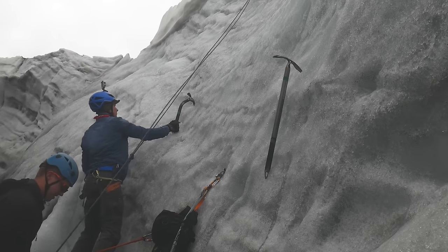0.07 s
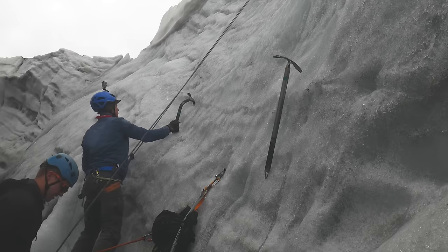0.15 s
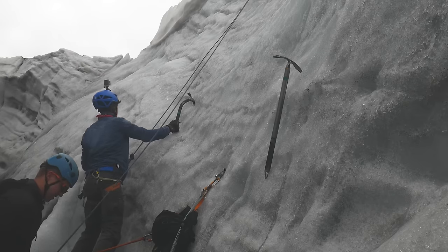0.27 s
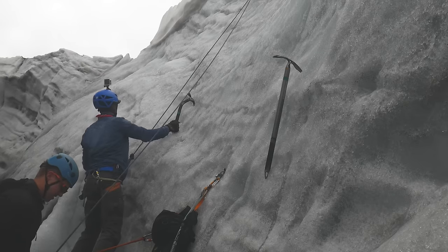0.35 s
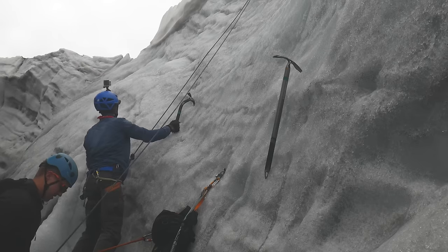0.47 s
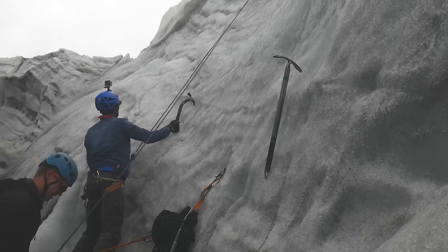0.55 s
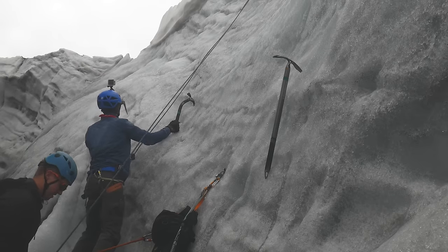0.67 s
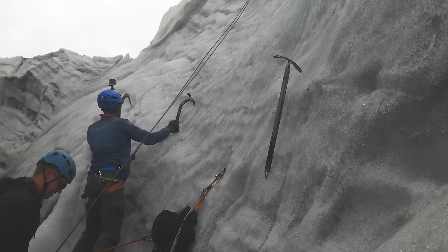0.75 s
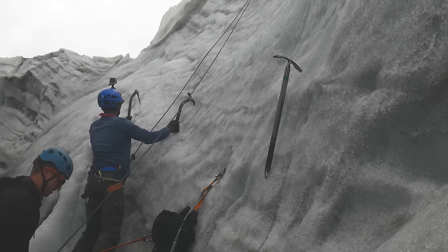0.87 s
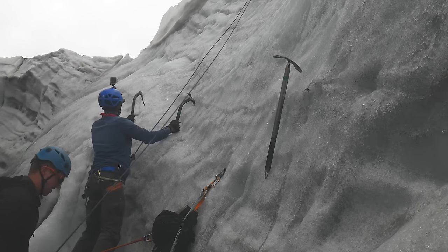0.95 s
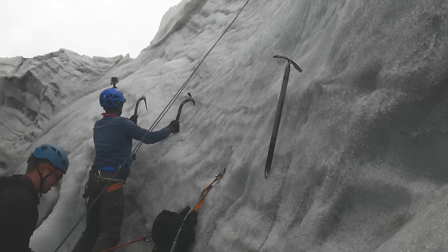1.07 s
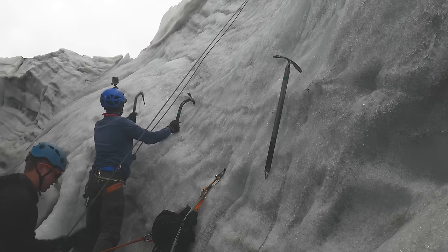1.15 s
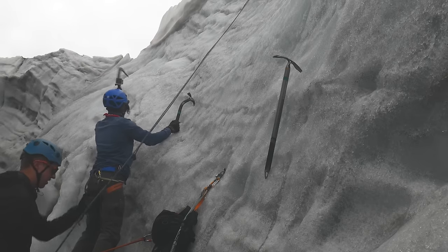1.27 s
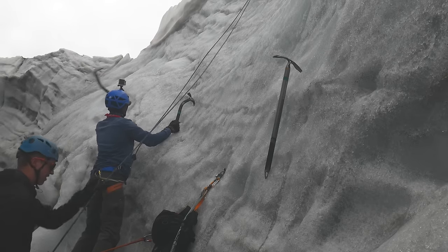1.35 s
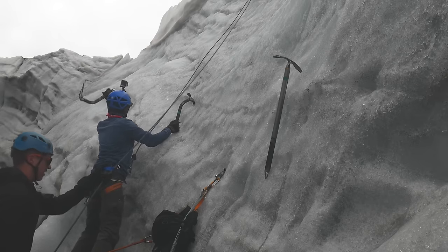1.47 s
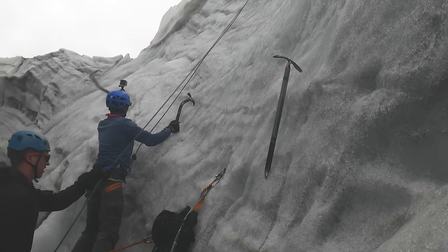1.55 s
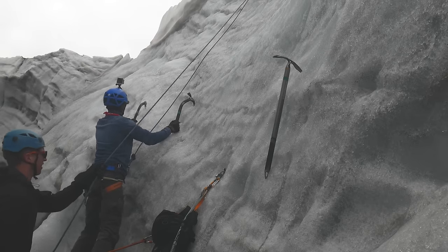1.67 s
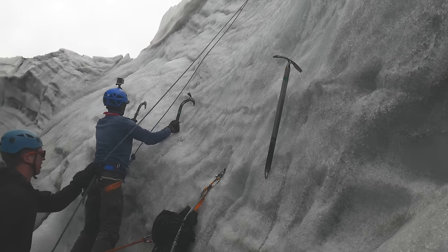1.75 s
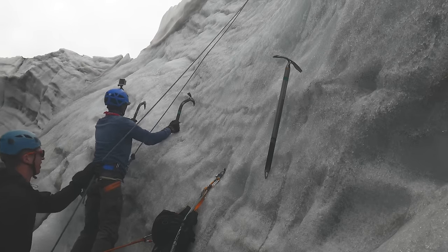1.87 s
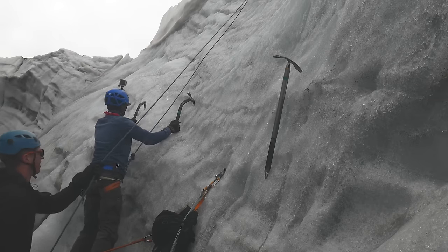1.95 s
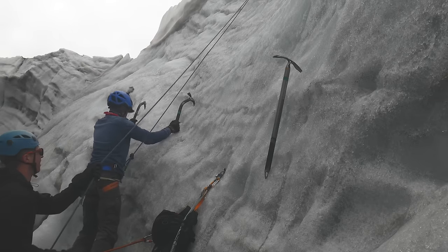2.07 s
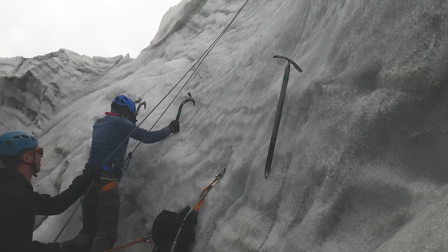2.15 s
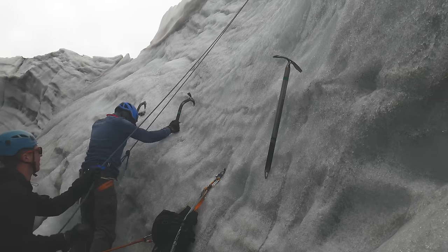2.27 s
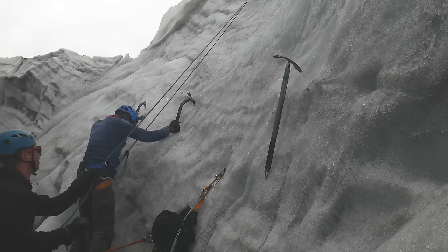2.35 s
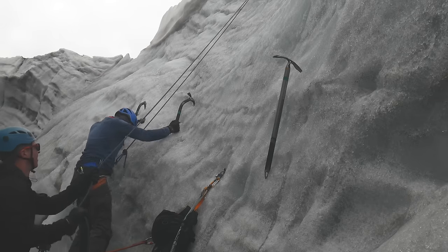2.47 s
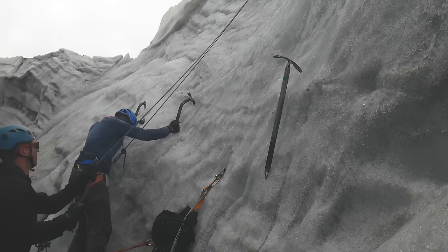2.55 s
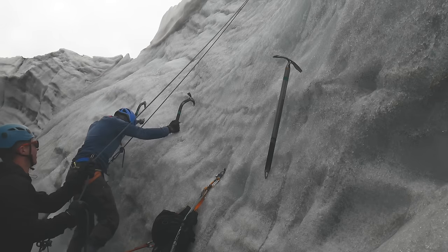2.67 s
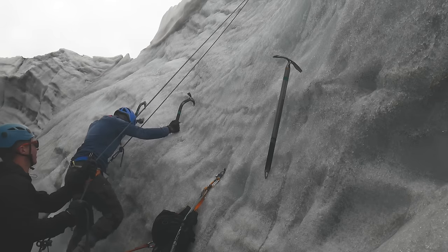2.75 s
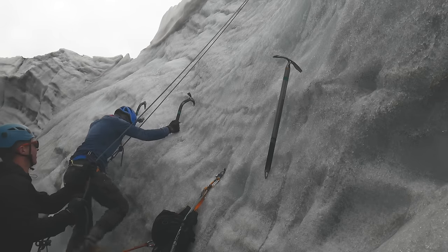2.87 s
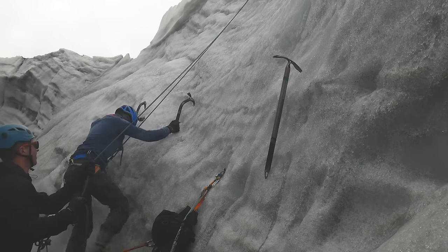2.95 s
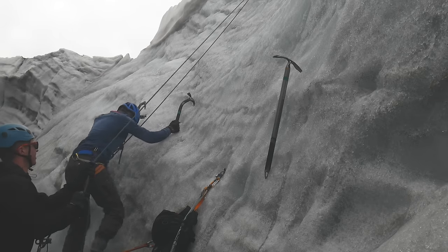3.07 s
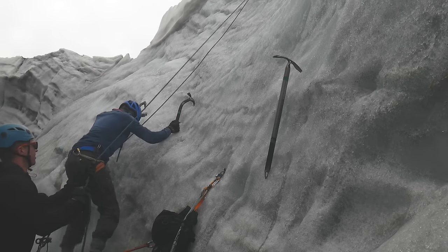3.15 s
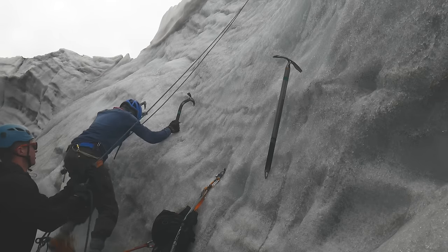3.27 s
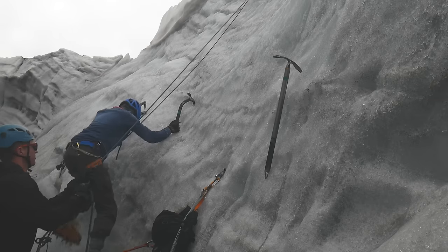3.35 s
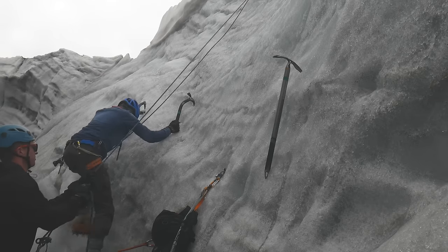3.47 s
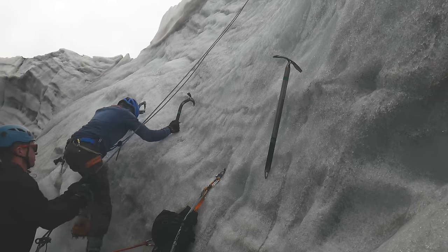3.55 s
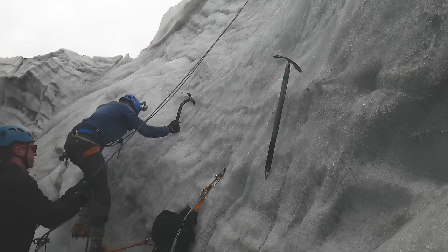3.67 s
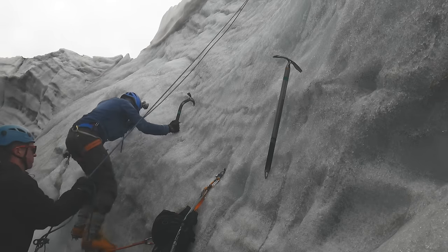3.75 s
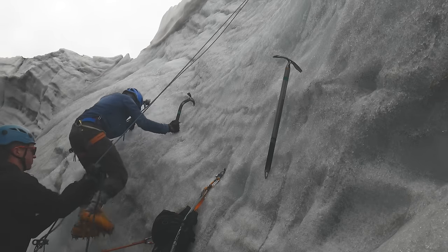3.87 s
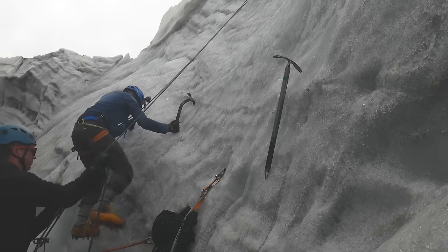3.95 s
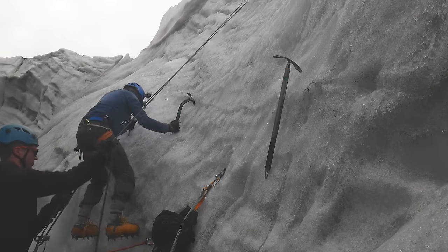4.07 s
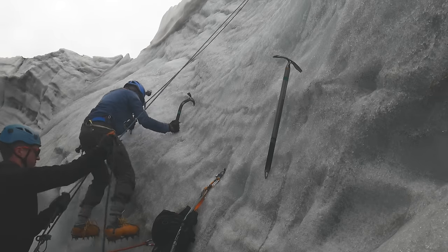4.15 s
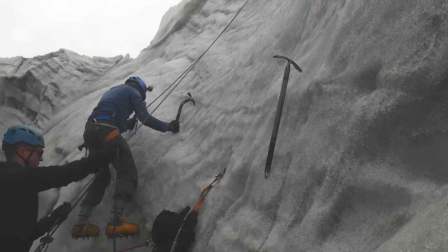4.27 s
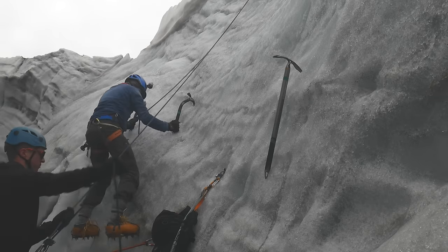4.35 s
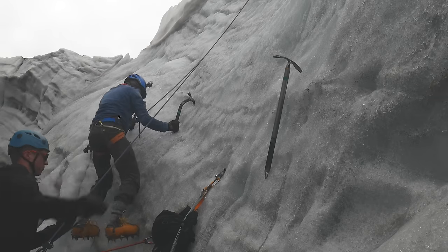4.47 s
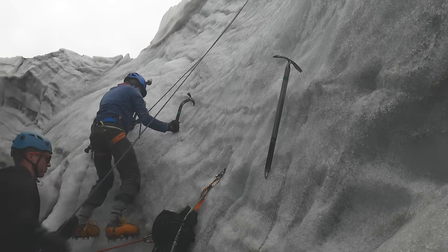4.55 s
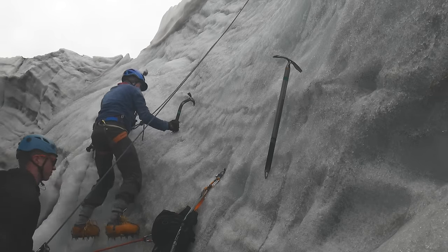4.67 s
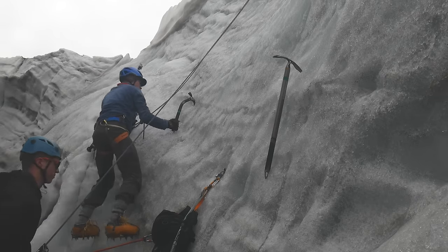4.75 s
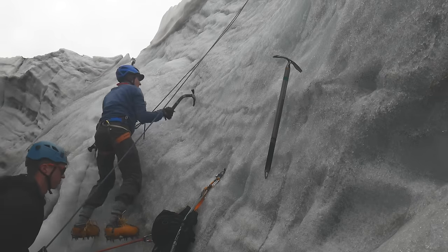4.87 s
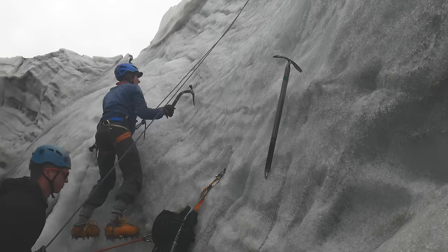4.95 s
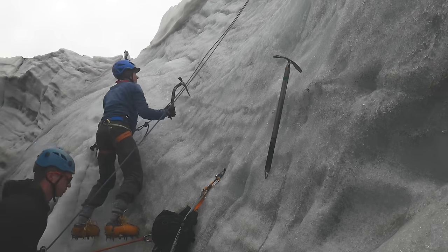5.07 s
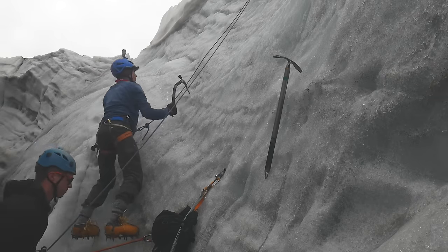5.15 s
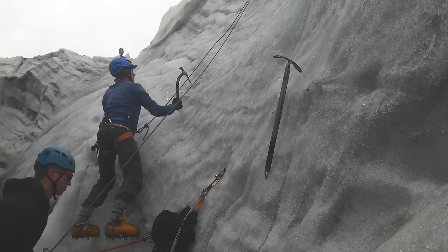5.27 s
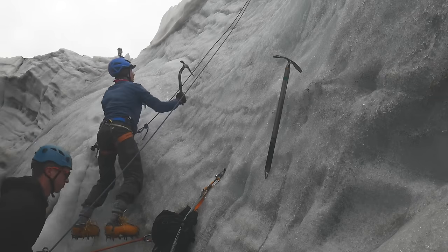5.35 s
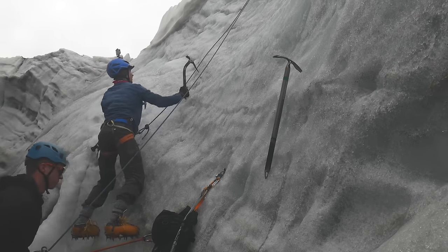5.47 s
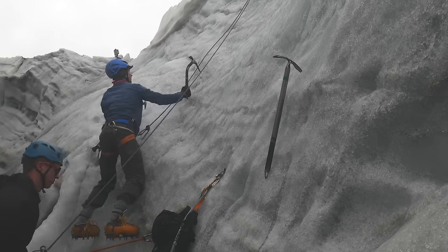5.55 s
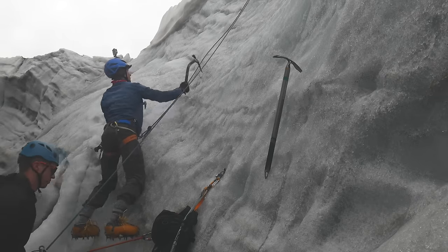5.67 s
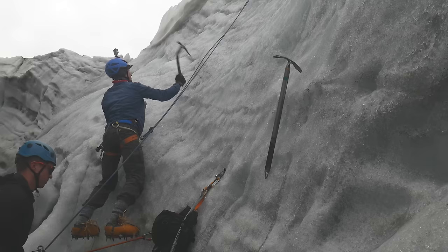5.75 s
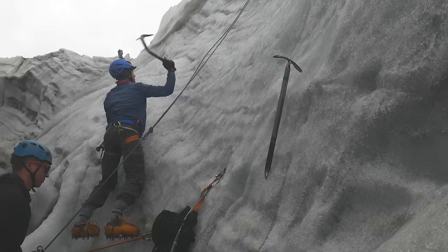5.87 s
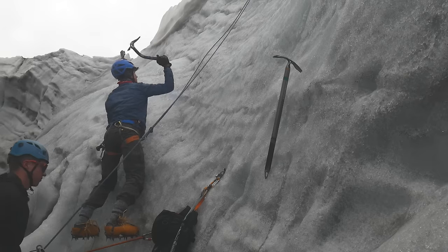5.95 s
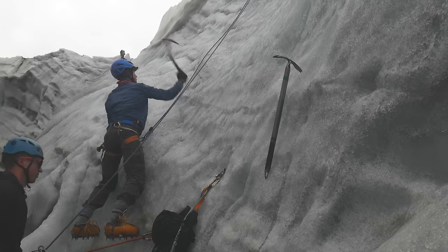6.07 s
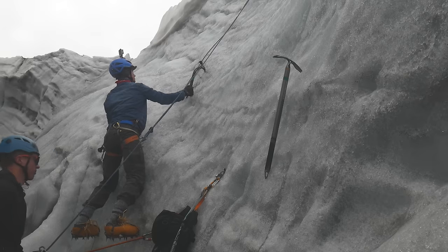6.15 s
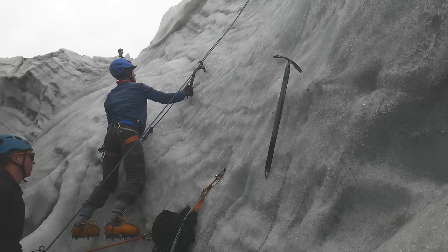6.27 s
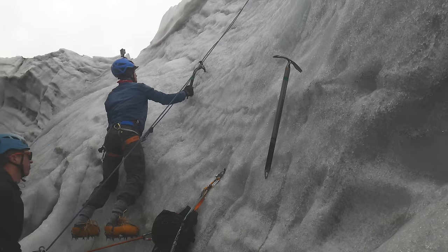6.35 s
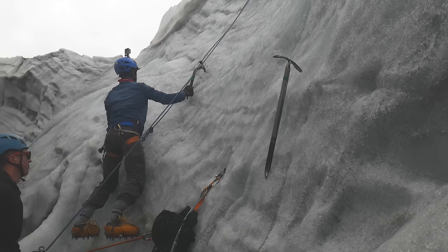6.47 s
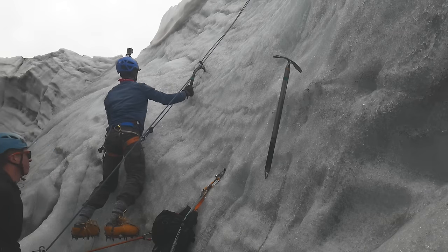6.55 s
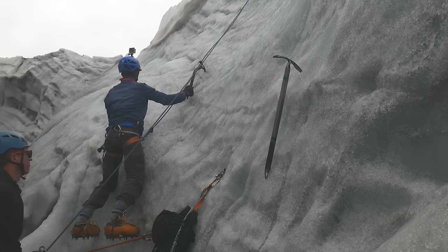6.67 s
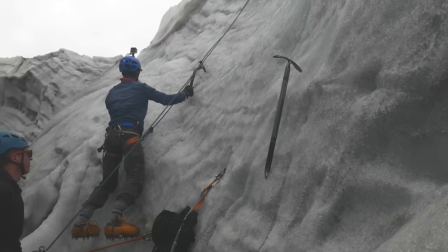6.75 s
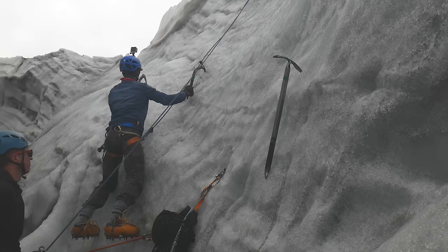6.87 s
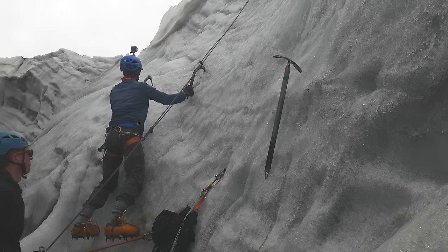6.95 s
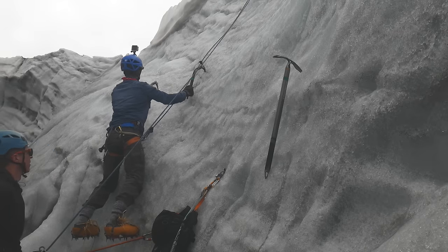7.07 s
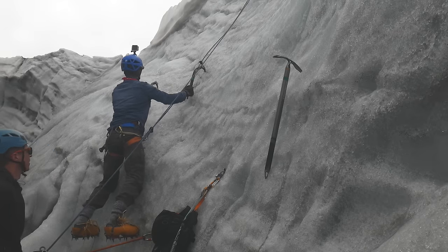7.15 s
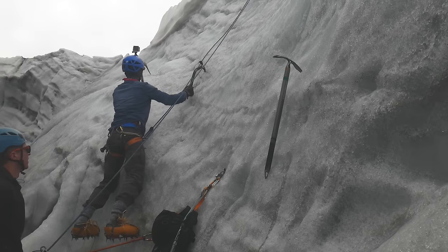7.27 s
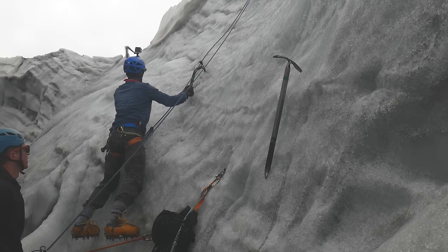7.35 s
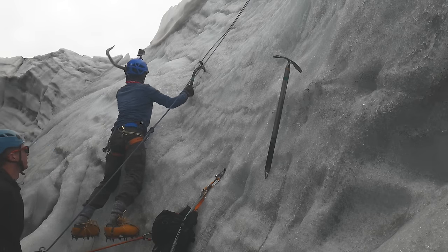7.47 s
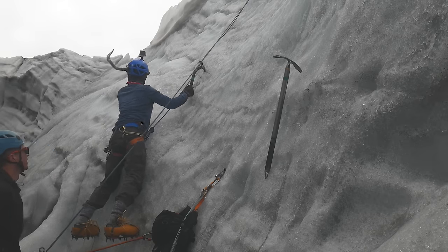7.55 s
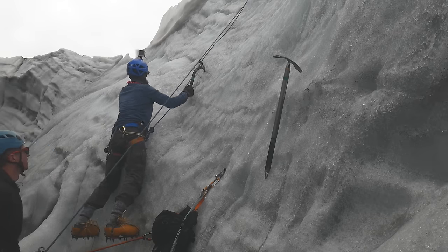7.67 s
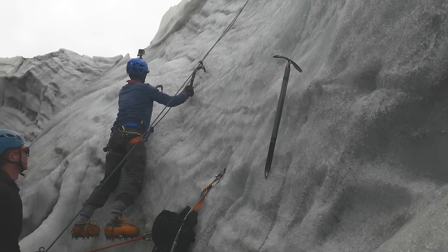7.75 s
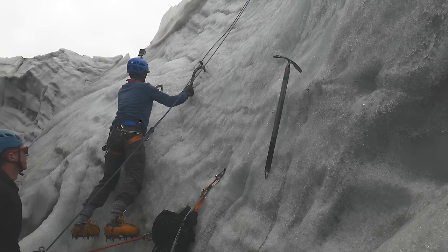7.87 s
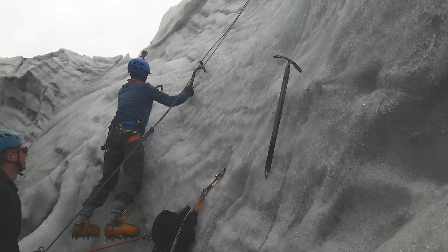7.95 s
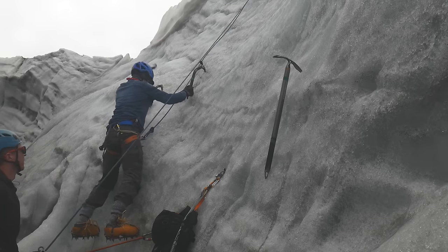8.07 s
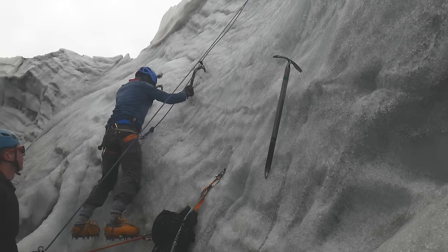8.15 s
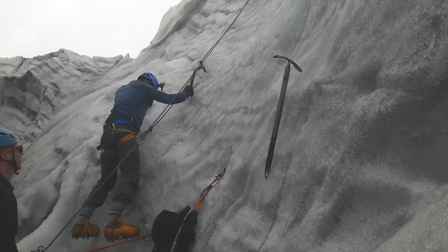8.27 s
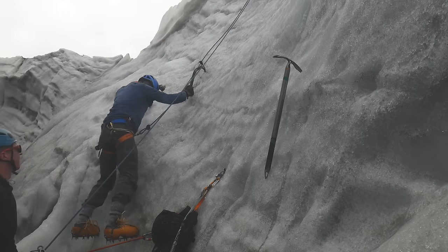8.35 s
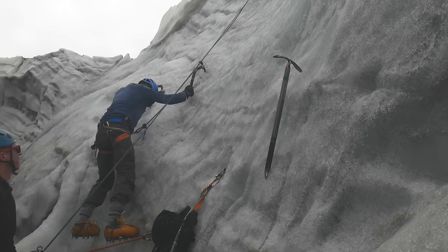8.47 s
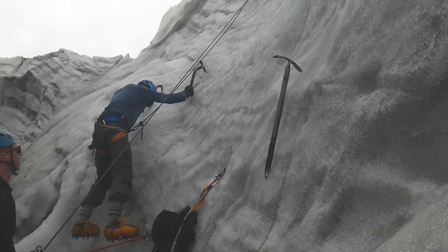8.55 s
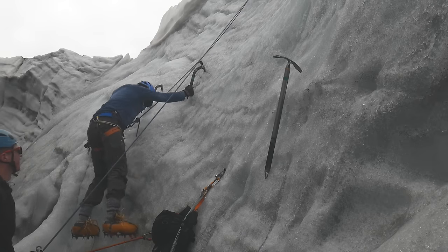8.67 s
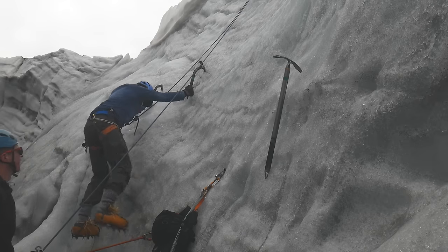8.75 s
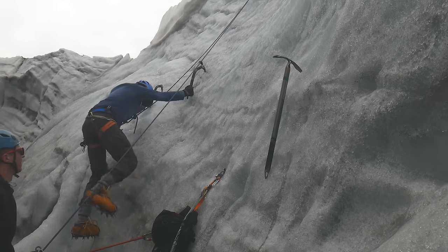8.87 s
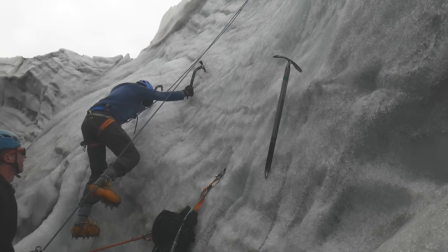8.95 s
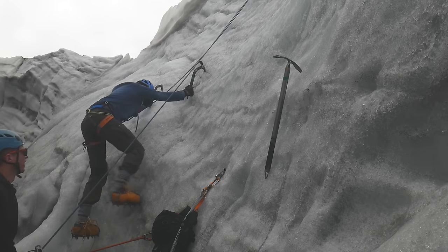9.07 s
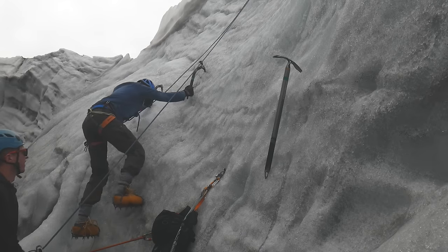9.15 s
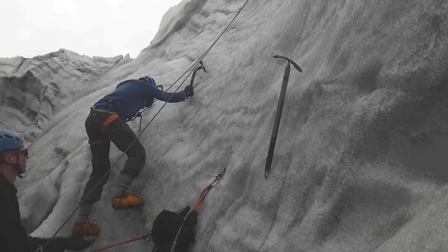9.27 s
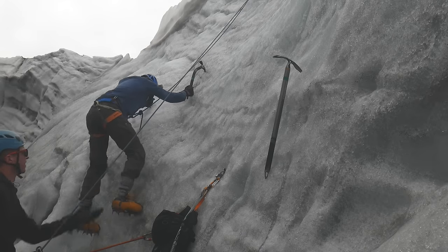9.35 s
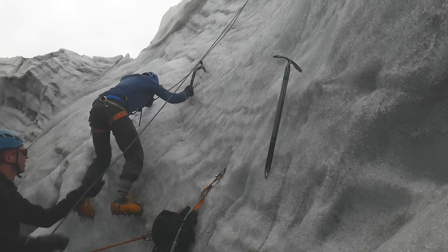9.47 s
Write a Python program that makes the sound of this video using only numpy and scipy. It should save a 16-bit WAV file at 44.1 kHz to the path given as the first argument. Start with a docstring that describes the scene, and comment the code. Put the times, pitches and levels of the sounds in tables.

```python
"""Sharp blows of ice axes and crampons on a glacier wall, among taps, scrapes and a clink, in wind and meltwater.
Each blow is a storm of micro-fractures ringing steel and ice, with a thud and falling chips; the wall echoes it.
Water is shaped noise, sine bubbles, fizz and ticks; wind is trains of eddies and single pressure dips.
An automatic level turns everything down after blows and in gusts."""
import sys
import numpy as np
from scipy import signal
from scipy.fft import rfft, irfft
from scipy.io import wavfile
from scipy.ndimage import uniform_filter1d

SR = 44100
rng = np.random.default_rng(int(sys.argv[2]) if len(sys.argv) > 2 else 0)


def persist_wave(psi):
    """Save psi, clipped to +-1, as 16-bit WAV."""
    counts = np.round(np.clip(psi, -1, 1) * 32767).astype(np.int16)
    wavfile.write(sys.argv[1], SR, np.atleast_2d(counts).T)


N = 418950

# Axe blows. Each row: time in seconds, level in dB, crush time in seconds, ice note in Hz, its level in dB,
# steel note in Hz, its level in dB, thud in dB, treble of the fracture in dB.
AXE_BLOWS = [(0.0602, -17, 0.0041, 2960, 8.5, 3580, 14, -15, -1.5),
             (1.7425, -18.5, 0.016, 1260, 2, 1725, 6, -4.5, -0.5),
             (6.2132, -20.5, 0.0036, 1290, -2, 1690, 5.5, -1.5, 0),
             (7.8148, -19.5, 0.02, 690, 6, 2150, -1.5, -10, -7)]
# Crampon blows, often one front point and then the other. Each row: columns as for the axe blows.
CRAMPON_BLOWS = [(3.0102, -20, 0.0089, 910, 7, 2530, -4, -6, 1),
                 (3.0215, -18, 0.0015, 1320, -13, 4400, -8.5, 1, -2.5),
                 (3.141, -26, 0.012, 980, 2, 1880, 3.5, 1.5, -3),
                 (3.5655, -23.5, 0.02, 970, 0, 1960, -18, 3, -1),
                 (3.583, -23, 0.0031, 890, 4, 2040, -7, 1.5, -2.5),
                 (4.103, -21.5, 0.0055, 1360, -20, 2800, 0, -16, -0.5),
                 (4.109, -22.5, 0.0042, 750, -1, 2280, 1.5, -0.5, 3.5),
                 (4.838, -22.5, 0.011, 885, 1, 1220, -1, -5.5, 1),
                 (4.854, -29, 0.0057, 890, 0, 1590, 2, -0.5, -9),
                 (9.171, -21.5, 0.0084, 814, -4, 2020, -2, -3, -0.5),
                 (9.181, -18.5, 0.0061, 980, -5, 4150, -9, -3, -3.5),
                 (9.421, -24, 0.028, 620, -17, 2060, -16, 2, -3)]
# Small knocks of steel on ice, of gear and of falling lumps. Each row: time in seconds, level in dB,
# ring in Hz, width of each of its two resonances in Hz, snap against the ring in dB.
LIGHT_TAPS = [(0.144, -40.5, 2320, 600, 3), (0.882, -42.5, 4170, 600, 15), (1.146, -34, 1490, 1000, 1),
              (1.285, -44.5, 5440, 3000, 1), (1.642, -44.5, 1550, 600, -17), (2.0258, -44, 3040, 198, -5),
              (2.177, -46.5, 1260, 1500, -18), (2.306, -47, 2620, 600, 11), (2.478, -46.5, 4800, 2500, -6),
              (2.63, -42, 3300, 2000, -2), (2.648, -33.5, 1870, 1810, 0), (2.668, -47, 4000, 2000, -4),
              (2.782, -45, 2960, 1800, -1), (2.862, -46, 4060, 1500, -12), (2.716, -41, 10000, 400, -7),
              (2.987, -43.5, 6870, 2500, 5), (3.2314, -38, 10200, 500, -12), (3.652, -44, 3100, 1200, -2),
              (3.7793, -39.5, 940, 400, -2), (3.891, -40, 890, 358, -31), (4.075, -43, 3180, 2000, 24),
              (4.3359, -40.5, 2130, 1200, -1), (4.418, -49, 4900, 1500, 1), (4.558, -45, 1180, 1520, -2),
              (4.739, -42, 7260, 600, 7), (4.939, -42, 2400, 1000, 0), (4.962, -45, 2300, 400, 6),
              (5.0135, -42.5, 2290, 400, 1), (5.0573, -43.5, 2300, 900, -3), (5.376, -47, 3100, 1500, 5),
              (5.466, -45, 2190, 1110, -7), (5.7083, -39, 2770, 1300, -3), (5.717, -39, 3430, 1500, 14),
              (6.201, -42.5, 4000, 3000, 12), (6.67, -37.5, 3350, 400, -2), (6.96, -44.5, 3800, 1800, 2),
              (7.195, -35.5, 1700, 450, -5), (7.197, -41, 2300, 450, -7), (7.44, -40.5, 2720, 600, 14),
              (8.056, -44, 5950, 1500, 1), (8.231, -47, 5100, 2000, -2), (8.2702, -38.5, 6700, 1500, 9),
              (8.316, -44, 3120, 1300, 4), (8.526, -45, 6130, 4000, 8), (8.5968, -37, 5200, 4000, 8),
              (8.796, -43.5, 2040, 900, 0), (8.823, -40.5, 8400, 2500, 0), (8.89, -37.5, 3360, 1500, 17),
              (8.964, -37.5, 4600, 3050, 5), (9.105, -39, 3400, 2030, 12)]
# Fine crackle of wet ice and clothing. Each row: time in seconds, level in dB.
CRACKLE_LEVEL = [(0, -50), (1.4, -47.5), (2.3, -53), (2.65, -47), (3.9, -50), (5.7, -48.5), (6.2, -52.5),
                 (6.28, -67), (6.38, -51.5), (6.43, -46), (6.6, -50), (6.9, -49.5), (8.0, -50.5),
                 (9.1, -45.5), (9.5, -45.5)]
# Loose ice grinding under the boots. Each row: time of the top in seconds, level in dB for a 29 ms scrape,
# length in seconds, pitch of the grains in Hz, their ring in dB.
ICE_SCRAPES = [(2.662, -38.5, .03, 2000, -11), (3.094, -32, 0.061, 427, 14), (3.128, -25, 0.0076, 1180, 6),
               (3.17, -32.5, 0.029, 880, -7), (3.559, -34, 0.012, 2000, -15),
               (3.641, -37.5, 0.059, 640, -14), (3.733, -41.5, 0.058, 940, -10),
               (4.186, -41.5, 0.086, 2500, -13), (4.436, -44.5, 0.021, 583, 6),
               (4.822, -32.5, 0.024, 1190, -10), (4.935, -38, 0.075, 2400, -10),
               (5.072, -42, 0.04, 1010, 12), (7.205, -38, 0.028, 2140, -10), (7.462, -43.5, 0.03, 2440, 19),
               (8.901, -45, 0.016, 1770, 3), (8.984, -43, .04, 3630, 3), (9.071, -43, 0.02, 1600, 8),
               (9.443, -24, 0.036, 1300, -10)]
# Resonances of the axe. Each row: frequency in Hz, width in Hz, level in dB.
AXE_MODES = [(584, 45, 2.5), (1235, 72, 1), (1870, 160, 2), (2325, 89, 1), (3040, 910, -5), (3816, 46, 1),
             (4420, 420, -7), (6320, 200, -7), (7050, 150, -2), (8840, 350, -10), (10300, 200, -13)]
# Resonances of the crampon. Each row: frequency in Hz, width in Hz, level in dB.
CRAMPON_MODES = [(513, 67, -12), (995, 45, 3), (1560, 160, 10), (2530, 420, 6), (2900, 200, -24.5),
                 (3790, 220, 6), (4960, 73, 3), (5330, 110, -17), (8350, 260, -5), (9450, 200, -8)]
# Ringing of the pick against metal. Each row: frequency in Hz, width in Hz, level in dB.
PICK_MODES = [(3680, 200, -15), (4630, 120, -3), (4960, 200, 4), (5350, 200, -1), (5900, 130, 5),
              (6640, 120, -5), (7120, 100, -3)]
# Spectrum of breaking ice. Each row: frequency in Hz, level in dB per Hz.
FRACTURE_SPECTRUM = [(100, 9), (400, -5.5), (1000, 0.5), (2000, 1.5), (4000, 0.5), (6500, -1.5), (8000, -8),
                     (10300, 1), (13000, -12), (16000, -22)]
# Spectrum of wind; gusts shift it by their speed. Each row: unshifted frequency in Hz, level in dB per Hz.
WIND_SPECTRUM = [(20, -25), (45, -13.5), (80, -1), (150, 3), (230, -2.5), (330, -13), (500, -25),
                 (900, -49.5), (2500, -70.5)]
# Spectrum of distant water. Each row: frequency in Hz, level in dB per Hz.
WATER_SPECTRUM = [(25, 0), (90, 9), (180, -5), (350, -9), (700, -6.5), (1300, -11), (3000, -9.5),
                  (8000, -21.5), (16000, -43)]
# Spectrum of the fizz. Each row: frequency in Hz, level in dB per Hz.
FIZZ_SPECTRUM = [(300, 5), (1000, 3), (2200, -1.5), (4500, 1.5), (7200, 1), (7900, -5), (8600, 1),
                 (10500, 3), (12500, -1), (15500, -4.5)]
# Slaps of the hardest eddies, one pressure dip each. Each row: time in seconds, peak in dB, width in seconds.
PRESSURE_SLAPS = [(0.195, -7.5, 0.0013), (0.294, -15.5, 0.00079), (0.3436, -17, 0.0012),
                  (0.4384, -6, 0.001), (0.461, -24, 0.0007), (0.584, -11, 0.00058), (0.621, -19, .0011),
                  (0.668, -3.5, 0.0015), (0.798, -15, 0.0019), (2.131, -26, 0.0015), (2.821, -27.5, 0.002),
                  (2.907, -13.5, 0.0017), (6.259, -6, 0.0021), (6.2654, -6.5, 0.00094),
                  (6.285, -25, 0.0009), (6.329, -11, 0.0019), (6.368, -9, 0.0016), (6.533, -14, 0.0019),
                  (6.639, -7.5, 0.0018), (6.676, -10.5, 0.0016), (7.254, -6, 0.0018),
                  (8.034, -19.5, 0.0021), (8.135, -13.5, 0.0018), (8.177, -13.5, 0.0017),
                  (8.449, -15, 0.0027), (8.498, -16, .0018), (8.783, -13.5, 0.0016), (9.2748, 1, 0.0013),
                  (9.3143, -3, 0.001), (9.3275, -9, 0.00082), (9.419, -4, 0.0011)]
# Spectrum of the thud behind a blow. Each row: frequency in Hz, level in dB per Hz.
THUD_SPECTRUM = [(25, -54), (70, -17), (130, -2), (230, 2.5), (330, -9.5), (500, -7.5), (800, -17),
                 (2000, -33.5)]
# Difference of the wind between the microphone ports. Each row: frequency in Hz, level in dB.
PORT_CONTRAST = [(40, -8), (120, -6), (250, -0.5), (450, 9), (900, 15)]
# The freed axe rattling against metal. Each row: time in seconds, level in dB, ring in Hz,
# width of each of its two resonances in Hz, the pick's own ring in dB.
AXE_RATTLES = [(5.601, -35.5, 4100, 500, -22), (5.613, -43, 3540, 300, -16), (5.617, -35.5, 4570, 1500, 7)]
# Spectrum of falling chips. Each row: frequency in Hz, level in dB per Hz.
CHIP_SPECTRUM = [(100, 0.5), (400, 3.5), (1100, -2), (2400, -6), (4000, -7), (7000, -12.5), (10500, -13.5),
                 (15000, -35)]
# Gusts that reach the microphone. Each row: start in seconds, length in seconds, level in dB,
# left minus right in dB.
WIND_GUSTS = [(0.146, 0.016, -26.5, 2), (0.185, 0.034, -22.5, 0.5), (0.272, 0.081, -19.5, 2),
              (0.413, 0.089, -21.5, -3), (0.532, 0.072, -22, -2), (0.616, 0.032, -20, 1),
              (0.765, 0.039, -29.5, 2), (0.901, 0.11, -35.5, 1), (1.125, 0.034, -30, 3),
              (1.227, 0.032, -30.5, 4), (1.544, 0.047, -35, -2), (1.875, 0.024, -29, 0),
              (2.036, 0.014, -33.5, 4), (2.086, 0.093, -33, 2), (2.878, 0.098, -27, -2),
              (3.188, 0.14, -33, -1), (4.112, 0.066, -27.5, -2), (4.575, 0.04, -40, 1),
              (6.023, 0.044, -34.5, 0), (6.232, 0.077, -22, -7), (6.349, 0.033, -23.5, -4),
              (6.406, 0.034, -23.5, -2), (6.486, 0.03, -28, 1), (6.53, 0.15, -25.5, 3.5),
              (6.679, 0.065, -36, 2), (7.161, 0.07, -28.5, -1), (7.282, 0.047, -26.5, -1),
              (7.436, 0.083, -29, -2.5), (7.873, 0.029, -20, 2.5), (8.121, 0.045, -26.5, 6.5),
              (8.3, 0.024, -27, 3.5), (8.43, 0.095, -27, -5), (8.762, 0.045, -23.5, -9),
              (8.812, 0.023, -27.5, 1), (9.23, 0.027, -25.5, -9), (9.258, 0.027, -15.5, 1),
              (9.29, 0.19, -16, -2.5)]
# Opposed part of the fizz; the highest is widest. Each row: frequency in Hz, level in dB.
FIZZ_WIDTH = [(1000, -6), (5000, -6), (9000, -4.5), (13000, -2)]
# Light air between gusts. Each row: time in seconds, level in dB.
CALM_LEVEL = [(0, -57.5), (2.35, -61), (2.7, -44.5), (3.5, -57.5), (4.45, -53.5), (4.7, -48), (5.1, -58.5),
              (5.9, -54), (6.2, -54), (9.5, -42)]

TIME = np.arange(N) / SR
AGE = np.arange(SR // 3) / SR
SHORT_AGE = AGE[:SR // 20]
LOW_CUT_HZ, TOP_HZ = 65, 15800
PICK_STOP_S, FIRST_BITE_S = .0026, .005  # fade once crushed; first contact, which rings the steel most
EDDIES_PER_S, EDDY_S = 65, .008
EDDY_SPREAD_DB, EDDY_JITTER = -0.3, 0.32  # jitter as a share of their spacing
FLUTTER, FLUTTER_PER_S = 0.82, 320  # pressure flicks in the eddies: strength against the rush, rate
WAKE_DB, WAKE_S = -12.5, 0.076  # stirred air round each gust
SLAP_ROUNDNESS = 3.5  # lower: more pointed and higher reaching
GAIN_KNEE_DB, GAIN_SLOPE, GAIN_ATTACK_S, GAIN_RELEASE_S = -25, 0.63, 0.018, 0.044


def undb(db):
    """Decibels to gain."""
    return 10 ** (np.asarray(db) / 20)


def unit(x):
    """Scale to an rms of one."""
    return x / np.sqrt(np.mean(x ** 2))


def burst(x):
    """Scale a short sound to the energy of 20 ms at an rms of one."""
    return x / np.sqrt(np.sum(x ** 2) / (.02 * SR))


def curve(rows):
    """Gain over time from (s, dB) rows."""
    return undb(np.interp(TIME, *np.transpose(rows)))


def lag(x, seconds):
    """Follow x sluggishly, with an exponential time constant."""
    keep = np.exp(-1 / (seconds * SR))
    return signal.lfilter([1 - keep], [1, -keep], x)


def add(out, s, x):
    """Mix a sound in at time s."""
    i = int(np.clip(s * SR, 0, N - 1))
    out[..., i:i + x.shape[-1]] += x[..., :N - i]


def colour(x, points, size=4096):
    """Minimum-phase filter through (Hz, dB) points."""
    hz, db = np.transpose(points)
    bins_hz = np.arange(size // 2 + 1) * SR / size
    gain = undb(np.interp(np.log(bins_hz + 1), np.log(hz), db))
    cepstrum = irfft(np.log(gain))[:size // 2]
    cepstrum[1:] *= 2  # folding makes the filter causal
    impulse = irfft(np.exp(rfft(cepstrum, size)))
    return signal.fftconvolve(x, impulse)[:len(x)]


def ring(x, modes):
    """Drive damped (Hz, width Hz, dB) resonances."""
    out = 0
    for hz, width_hz, db in modes:
        b, a = signal.iirpeak(min(hz, TOP_HZ), hz / width_hz, SR)
        out = out + undb(db) * signal.lfilter(b, a, x)
    return out


def band(x, hz, width_hz):
    """One resonance passed twice for steep sides, scaled as a short sound."""
    note = [(hz, width_hz, 0)]
    return burst(ring(ring(x, note), note))


def cracks(rate, spread_db, size):
    """Random micro-fractures, rate a second, of unequal strength."""
    strength = undb(spread_db * np.minimum(rng.exponential(size=size), 4))
    struck = rng.random(size) < rate / SR
    return unit(struck * rng.standard_normal(size) * strength)


def grit(size, rate=420, fall=0.0049, spread_db=-0.5):
    """Noise in little clusters, as grains of ice break one after another."""
    hits = np.abs(cracks(rate, spread_db, SR))
    clusters = signal.lfilter([1], [1, -np.exp(-1 / (fall * SR))], hits)
    return rng.standard_normal(size) * unit(clusters)[-size:]


def walk(rate):
    """Slow random wander with an rms of one."""
    k = int(SR / rate)
    steps = np.repeat(rng.standard_normal(N // k + 1), k)
    return unit(uniform_filter1d(uniform_filter1d(steps, k), k)[:N])


def stereo(mid, side, side_db):
    """Left and right from a shared and an opposed part."""
    opposed = undb(side_db) * side
    return np.array([mid + opposed, mid - opposed])


def swell(length):
    """A rounded push of the given half-power length, and the time of its top."""
    t = np.arange(int(4 * length * SR)) / SR - 2 * length
    return 2 ** (-.5 * np.abs(2 * t / length) ** 2.6), 2 * length


def far_water():
    """Distant running water: shaped noise that wanders in level."""
    mid, side = (unit(colour(rng.standard_normal(N), WATER_SPECTRUM)) * undb(1.6 * walk(7.6)) for _ in range(2))
    return undb(-52.5) * stereo(mid, side, -2.0)


def fizz():
    """Fine uneven fizz: bright noise with micro-fractures, under the crackle level."""
    def source():
        """Hiss and fractures in one spectrum."""
        return unit(colour(rng.standard_normal(N) + 0.39 * cracks(2000, 3.2, N), FIZZ_SPECTRUM))
    mid = source() * undb(2.33 * walk(60))
    side = colour(source(), FIZZ_WIDTH)
    return stereo(mid, side, 0) * curve(CRACKLE_LEVEL)


def drips(rate, db, hz):
    """Meltwater drops into a hollow; each small bubble rises in pitch as it fades."""
    out = np.zeros(N)
    for when, pitch, size in rng.random((int(rate * N / SR), 3)):
        note_hz = hz * 2 ** (.5 * (pitch - .5))
        tone = np.sin(2 * np.pi * note_hz * AGE * (1 + 2 * AGE))
        bubble = tone * np.exp(-AGE / 0.0058) * (1 - np.exp(-AGE / 0.0001))
        add(out, when * N / SR, undb(db - 10 * size) * bubble)
    return out


def glacier():
    """Distant water, near drips and fizz together."""
    dripping = stereo(drips(20, -38, 740), drips(14, -41, 740), -3)
    return far_water() + fizz() + dripping


def pops(rate, db, fall, spread_db):
    """Air bubbles burst out of melting ice at scattered places between left and right: tiny bright ticks."""
    out, activity = np.zeros((2, N)), curve(CRACKLE_LEVEL)
    for when, place, size in rng.random((int(rate * N / SR), 3)):
        snap = rng.standard_normal(len(SHORT_AGE)) * np.exp(-SHORT_AGE / fall)
        tick = burst(colour(snap, FIZZ_SPECTRUM))
        strength = undb(db - spread_db * size) * activity[int(when * N)]
        add(out, when * N / SR, strength * tick * np.sqrt([[.5 + place], [1.5 - place]]))
    return out


def crumbs(rate, db, hz, spread_db, width_hz):
    """Bits of ice tick down the wall, each with its own pitch, louder when the crackle is."""
    out, activity = np.zeros(N), curve(CRACKLE_LEVEL)
    for when, pitch, size in rng.random((int(rate * N / SR), 3)):
        chip = rng.standard_normal(len(SHORT_AGE)) * np.exp(-SHORT_AGE / 0.012)
        note_hz = hz * 2 ** (3.4 * (pitch - .5))
        strength = undb(db - spread_db * np.log(size + 0.04)) * activity[int(when * N)]
        add(out, when * N / SR, strength * band(chip, note_hz, width_hz))
    return out


def blows(rows, modes, rise, fall, modes_db, chips_db, chips_fall, thud_fall, width_at_1khz_hz, slowing):
    """Steel crushes in, slowing: fractures ring tool and ice, the mass thuds, chips break off unevenly."""
    out = np.zeros(N)
    for s, db, crush, ice_hz, ice_db, steel_hz, steel_db, thud_db, treble_db in rows:
        crushed = np.minimum(AGE / crush, 1)
        after = np.maximum(AGE - rise / 2 - crush, 0)
        bite = np.minimum(AGE / rise, 1) ** 2 * np.exp(-slowing * crushed)
        force = bite * np.exp(-after / fall) * grit(len(AGE), rate=3200, fall=0.0006)
        crack = burst(colour(force, FRACTURE_SPECTRUM)) + undb(modes_db) * burst(ring(force, modes))
        crack = colour(crack, [(1500, 0), (3500, treble_db)])
        contact = force * np.exp(-AGE / FIRST_BITE_S)
        for drive, hz, note_db in (force, ice_hz, ice_db), (contact, steel_hz, steel_db):
            width_hz = width_at_1khz_hz * np.sqrt(hz / 1000)  # higher notes die sooner
            crack += undb(note_db) * band(drive, hz, width_hz)
        shards = grit(len(AGE), rate=380, fall=0.0025, spread_db=-1.4)
        chips = colour(shards * crushed * np.exp(-after / chips_fall), CHIP_SPECTRUM)
        mass = rng.standard_normal(len(AGE)) * crushed * np.exp(-after / thud_fall)
        thud = colour(mass, THUD_SPECTRUM)
        blow = burst(crack) + undb(chips_db) * burst(chips) + undb(thud_db) * burst(thud)
        add(out, s - rise / 2, undb(db) * blow)
    return out


def axes():
    """Picks bite: strong steel modes and a quick stop."""
    return blows(AXE_BLOWS, AXE_MODES, rise=0.00208, fall=PICK_STOP_S, modes_db=12.0, chips_db=-6.5,
                 chips_fall=0.024, thud_fall=0.024, width_at_1khz_hz=164, slowing=0.31)


def boots():
    """Crampon points kick in: weaker steel modes and longer chips."""
    return blows(CRAMPON_BLOWS, CRAMPON_MODES, rise=.003, fall=0.0013, modes_db=-6.5, chips_db=-8.5,
                 chips_fall=0.039, thud_fall=0.013, width_at_1khz_hz=360, slowing=0.32)


def taps():
    """Light touches of points, hardware and lumps of ice: fractures and one short ring each."""
    out = np.zeros(N)
    for s, db, hz, width_hz, snap_db in LIGHT_TAPS:
        decay = np.exp(-AGE / 0.003) + undb(-14) * np.exp(-AGE / 0.014)
        force = cracks(9000, 0.65, len(AGE)) * (1 - np.exp(-AGE / .0003)) * decay
        snap = burst(colour(force, FRACTURE_SPECTRUM))
        add(out, s, undb(db) * burst(band(force, hz, width_hz) + undb(snap_db) * snap))
    return out


def at_ports(mid, side):
    """Large eddies cover both microphone ports; small ones differ between them."""
    return stereo(mid, colour(side, PORT_CONTRAST), -3.5)


def eddies(length, count=16):
    """Pressure of one gust: a loose train of rounded, unequal pushes, and its lead time."""
    lead = EDDY_S * 2
    t = np.arange(2 * SR // 3) / SR - lead
    number = int(np.clip(round(length * EDDIES_PER_S), 1, count))
    push = np.zeros(len(t))
    for k, (shift, size) in enumerate(rng.standard_normal((count, 2))[:number]):
        top = length * (k + .5 + EDDY_JITTER * np.tanh(shift)) / number
        push += undb(EDDY_SPREAD_DB * size) * 2 ** (-2 * ((t - top) / EDDY_S) ** 2)
    return push, lead


def turbulence(push, spectrum):
    """A smooth rush and sharp flicks, swelling with the push."""
    size = len(push)
    air = rng.standard_normal(size) + FLUTTER * cracks(FLUTTER_PER_S, 0.5, size)
    return unit(colour(air * push, spectrum))


def gusts():
    """Gusts break into eddies at the ports, harder ones higher in pitch; also returns their power."""
    out, power = np.zeros((2, N)), np.zeros(N)
    for s, length, db, left_db in WIND_GUSTS:
        push, lead = eddies(length)
        speed = undb(0.34 * (db + 28.0))
        spectrum = [(hz * speed, gain_db) for hz, gain_db in WIND_SPECTRUM]
        mid, side = (turbulence(push, spectrum) for _ in range(2))
        gust = at_ports(mid, side) * np.sqrt(length * SR / len(push))
        add(out, s - lead, gust * undb([[db + left_db / 2], [db - left_db / 2]]))
        add(power, s, np.full(int(length * SR), undb(db) ** 2))
    return out, power


def breeze(gust_power):
    """Light wandering air, stirred up round each gust."""
    wake = uniform_filter1d(lag(gust_power, WAKE_S / 2), int(WAKE_S * SR))
    level = np.sqrt(curve(CALM_LEVEL) ** 2 + undb(WAKE_DB) ** 2 * np.abs(wake))
    mid, side = (unit(colour(rng.standard_normal(N), WIND_SPECTRUM)) * level * undb(5.85 * walk(35))
                 for _ in range(2))
    return at_ports(mid, side)


def slaps():
    """The hardest eddies: a single pressure dip each, with shallow positive shoulders, alike in both ears."""
    out = np.zeros((2, N))
    lead = .01
    for s, db, width in PRESSURE_SLAPS:
        away = ((AGE - lead) / width) ** 2 / SLAP_ROUNDNESS
        dip = ((2 * SLAP_ROUNDNESS + 1) * away - 1) / (1 + away) ** (SLAP_ROUNDNESS + 2)
        add(out, s - lead, undb(db) * dip)
    return out


def wind():
    """Gusts, the air they stir and the slaps of their hardest eddies."""
    buffets, power = gusts()
    return buffets + breeze(power) + slaps()


def scrapes(grain_width_hz=600):
    """Grains of ice break in dense clusters under the loaded points, each scrape at its own pitch."""
    out = np.zeros(N)
    for s, db, length, hz, ring_db in ICE_SCRAPES:
        push, lead = swell(length)
        force = grit(len(push), rate=660, fall=0.0027, spread_db=1.0) * push
        crunch = burst(colour(force, CHIP_SPECTRUM)) + undb(ring_db) * band(force, hz, grain_width_hz)
        add(out, s - lead, undb(db) * np.sqrt(length / 0.029) * burst(crunch))
    return out


def clink(fall=0.0022):
    """Quick metal contacts: two light ticks, then one that rings the whole pick."""
    out = np.zeros(N)
    for s, db, hz, width_hz, pick_db in AXE_RATTLES:
        force = cracks(9000, 1.1, len(AGE)) * np.exp(-AGE / fall)
        pick = burst(ring(force, PICK_MODES))
        add(out, s, undb(db) * burst(undb(pick_db) * pick + band(force, hz, width_hz)))
    return out


def ice_wall(x, echo_db, fall, left_db):
    """The rough wall scatters a brief, different echo to each ear."""
    scatter = [(100, -17), (380, -4.5), (1000, -0.5), (4000, -2.5), (12000, 0.0)]
    wet = []
    for _ in range(2):
        tail = rng.standard_normal(len(AGE)) * np.exp(-AGE / fall) * (AGE > .002)
        echo = colour(tail, scatter)
        wet.append(signal.fftconvolve(x, echo / np.linalg.norm(echo))[:N])
    return (x + undb(echo_db) * np.array(wet)) * undb([[left_db / 2], [-left_db / 2]])


def scene():
    """The climber on the wall, in meltwater and wind."""
    debris = crumbs(rate=60, db=-9, hz=2810, spread_db=2.5, width_hz=2170)
    climber = axes() + boots() + taps() + clink() + scrapes() + debris
    wall = ice_wall(climber, echo_db=-5.0, fall=0.016, left_db=3.0)
    bubbles = pops(rate=37, db=2.5, fall=0.0031, spread_db=19.5)
    return wall + glacier() + bubbles + wind()


def record(dry):
    """Automatic level turns down on smoothed power; the highest peaks are rounded and both ends cut."""
    dry = signal.sosfilt(signal.butter(2, LOW_CUT_HZ, "high", fs=SR, output="sos"), dry)
    power = lag(lag(np.mean(dry ** 2, axis=0), GAIN_ATTACK_S), GAIN_RELEASE_S)
    ducked = dry * (1 + power / undb(GAIN_KNEE_DB) ** 2) ** (-GAIN_SLOPE / 2)
    rounded = np.tanh(.7 * ducked) / .7
    soft = signal.sosfilt(signal.butter(2, 14500, fs=SR, output="sos"), rounded)
    return signal.sosfilt(signal.ellip(8, .2, 70, TOP_HZ, fs=SR, output="sos"), soft)


dry = scene()
out = record(dry)
persist_wave(out)
```